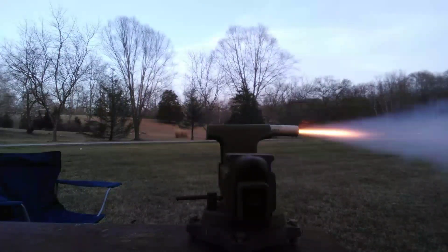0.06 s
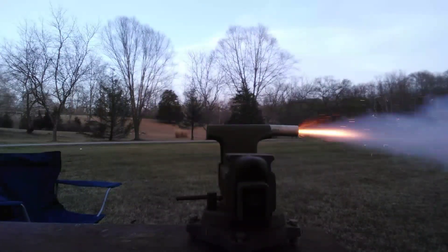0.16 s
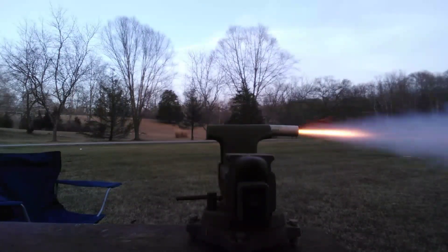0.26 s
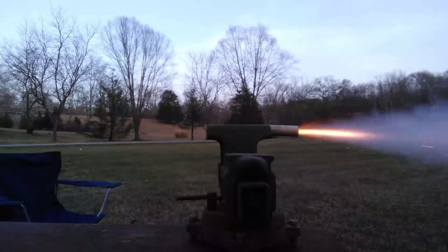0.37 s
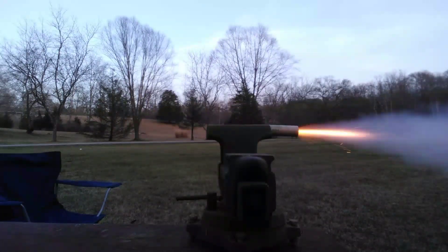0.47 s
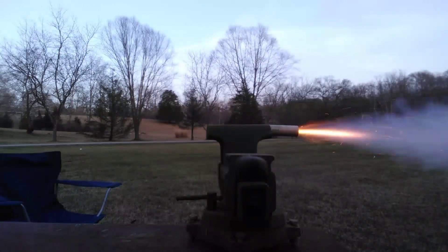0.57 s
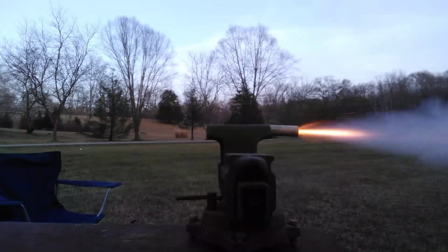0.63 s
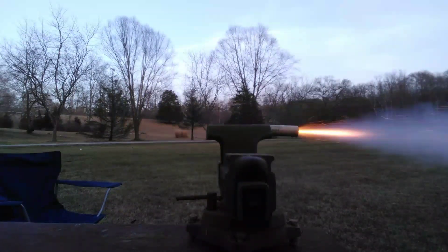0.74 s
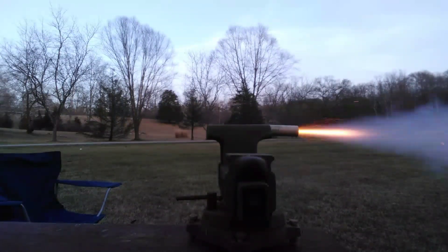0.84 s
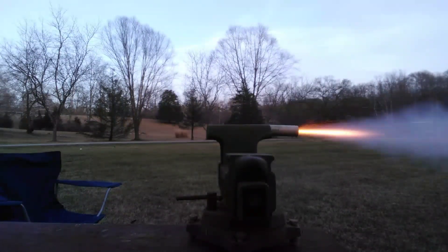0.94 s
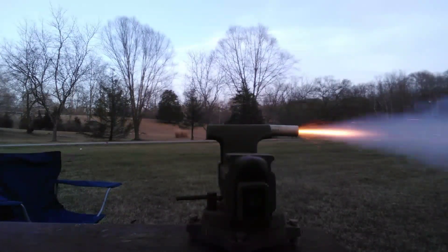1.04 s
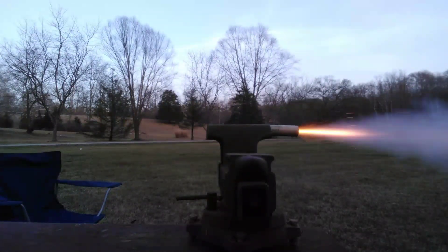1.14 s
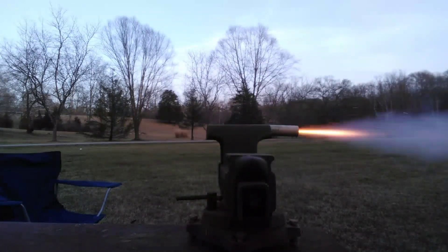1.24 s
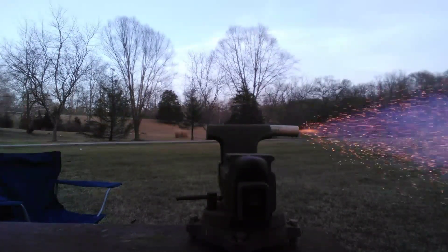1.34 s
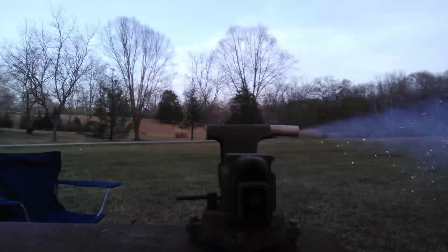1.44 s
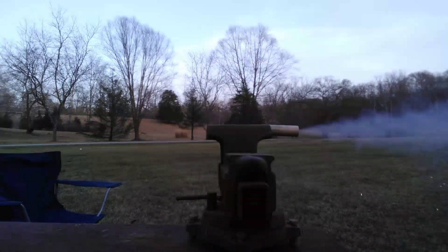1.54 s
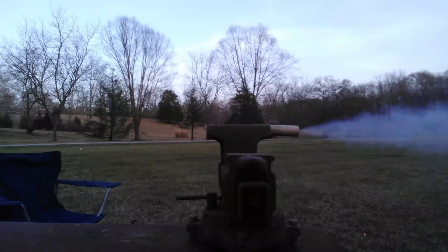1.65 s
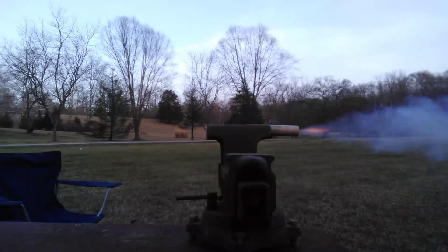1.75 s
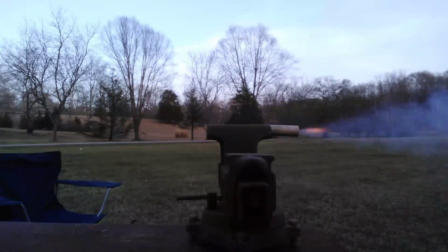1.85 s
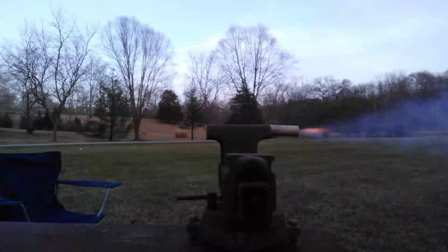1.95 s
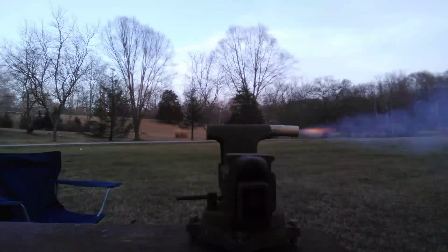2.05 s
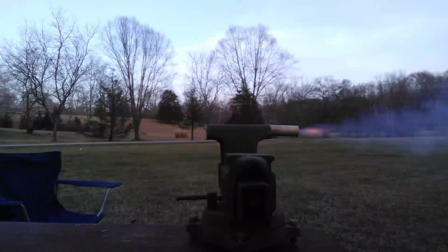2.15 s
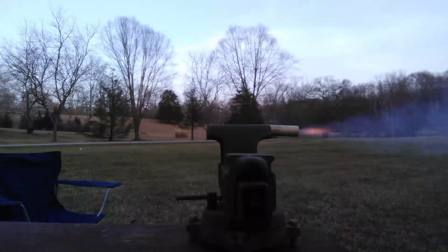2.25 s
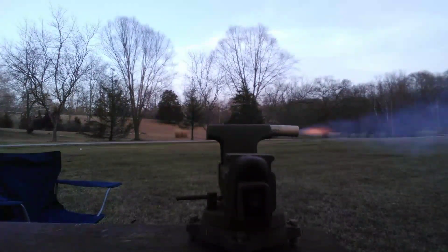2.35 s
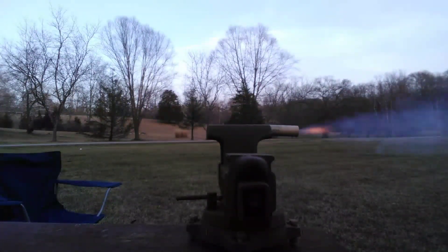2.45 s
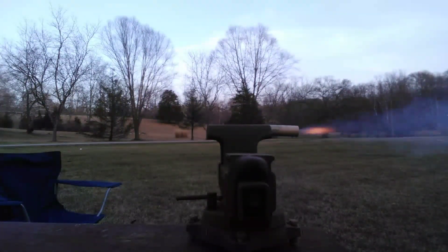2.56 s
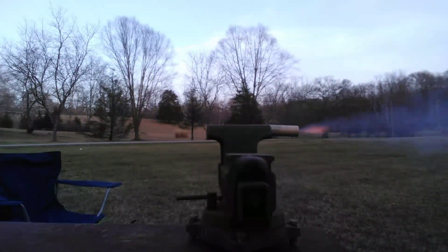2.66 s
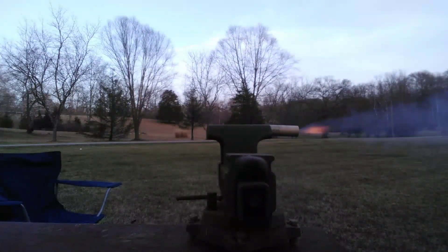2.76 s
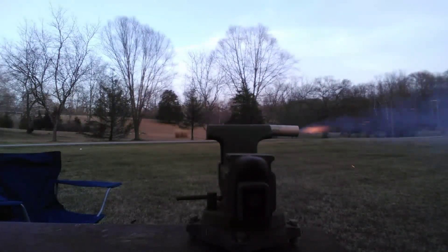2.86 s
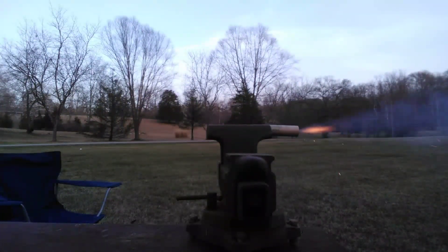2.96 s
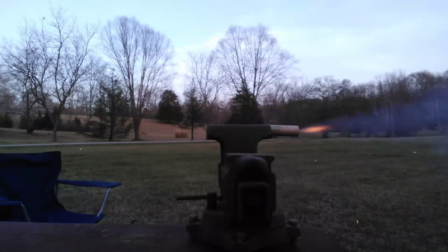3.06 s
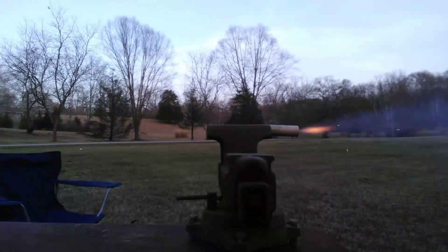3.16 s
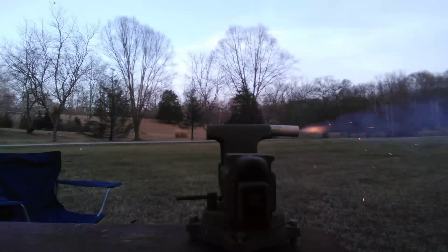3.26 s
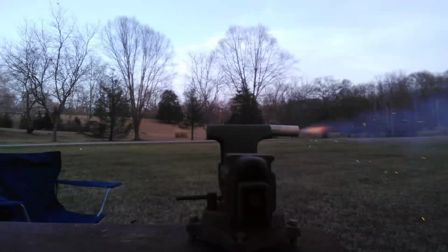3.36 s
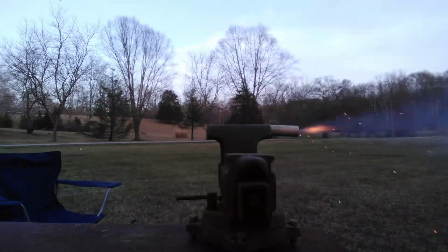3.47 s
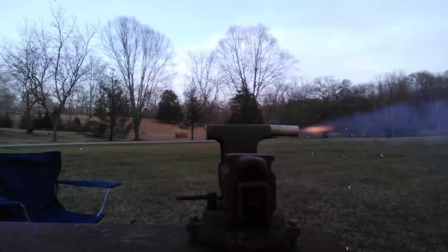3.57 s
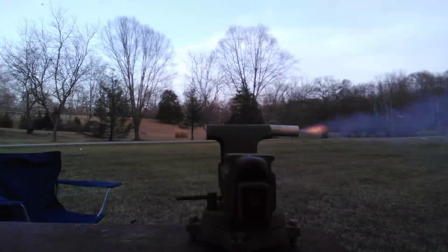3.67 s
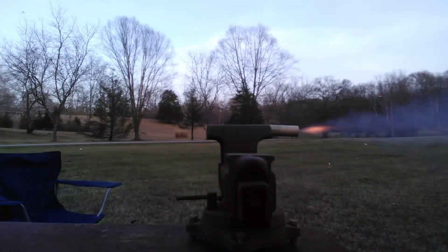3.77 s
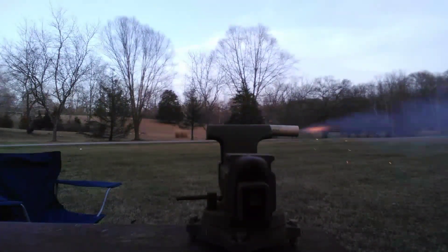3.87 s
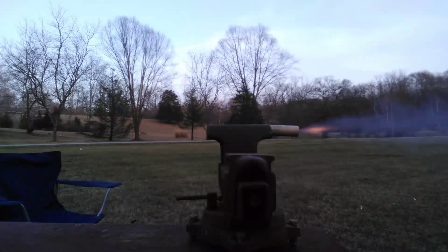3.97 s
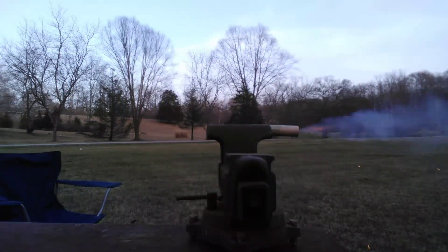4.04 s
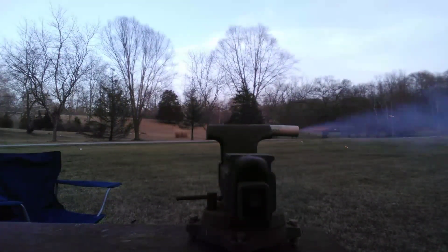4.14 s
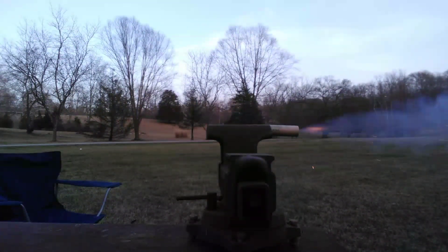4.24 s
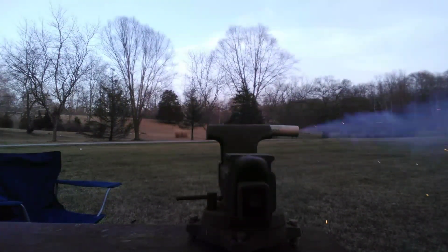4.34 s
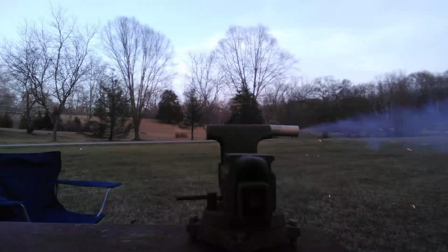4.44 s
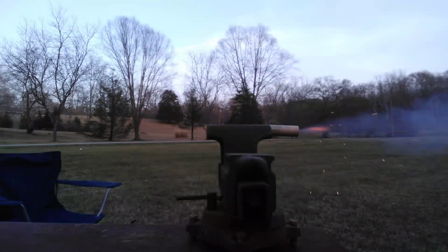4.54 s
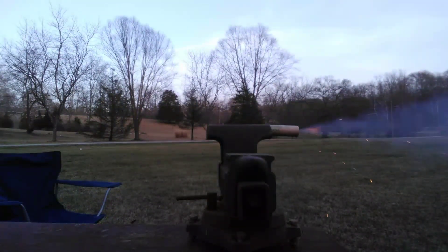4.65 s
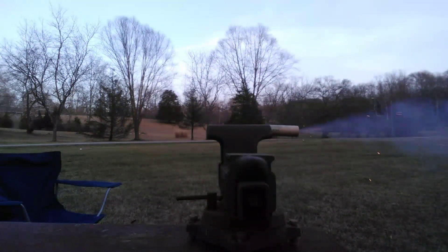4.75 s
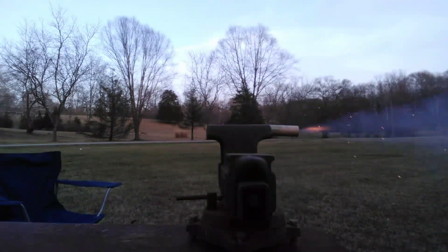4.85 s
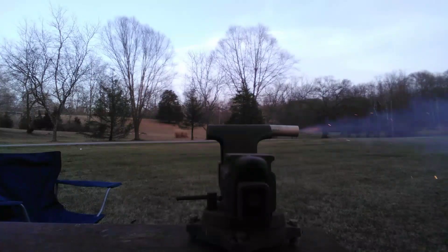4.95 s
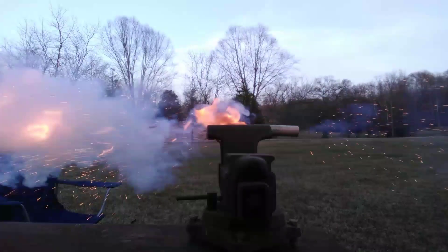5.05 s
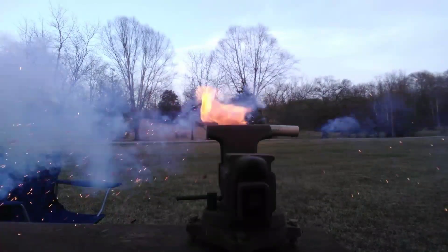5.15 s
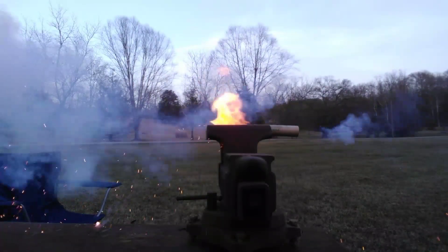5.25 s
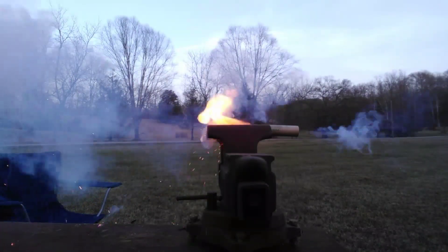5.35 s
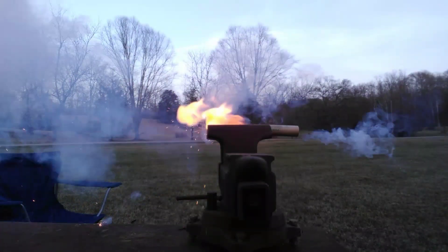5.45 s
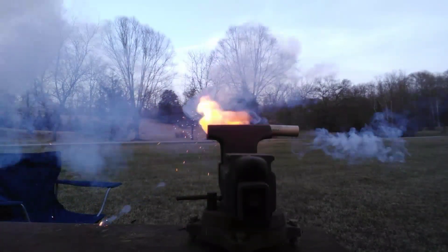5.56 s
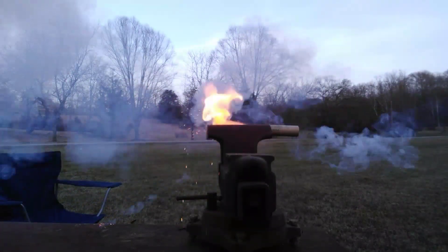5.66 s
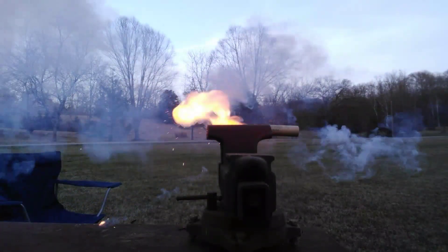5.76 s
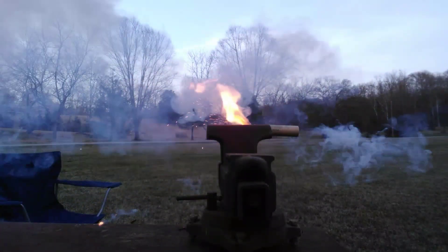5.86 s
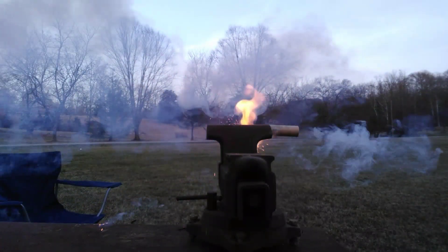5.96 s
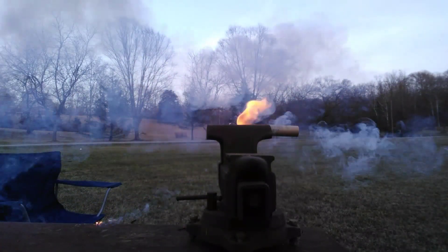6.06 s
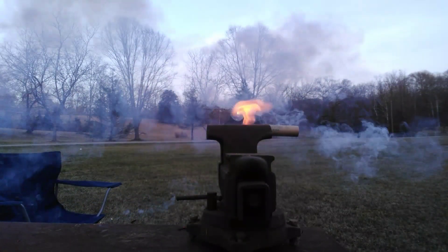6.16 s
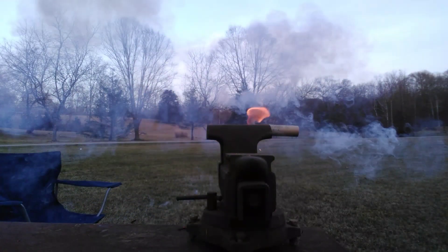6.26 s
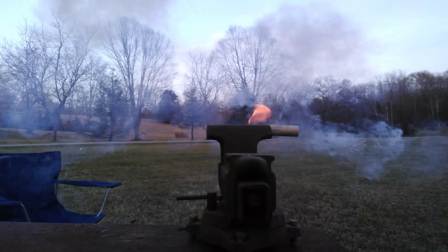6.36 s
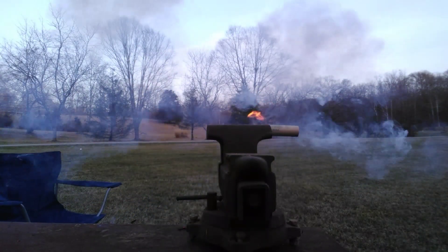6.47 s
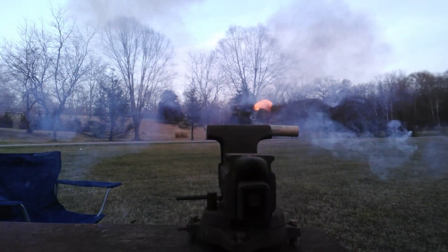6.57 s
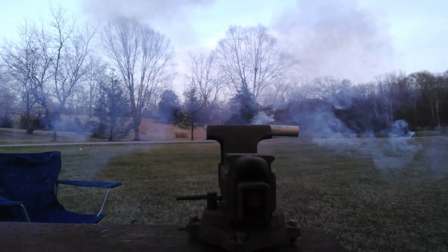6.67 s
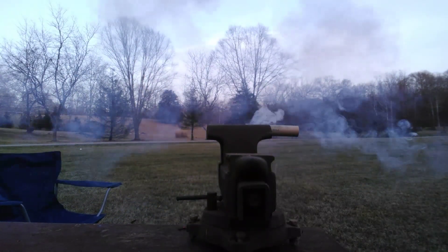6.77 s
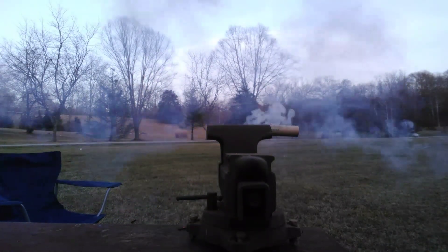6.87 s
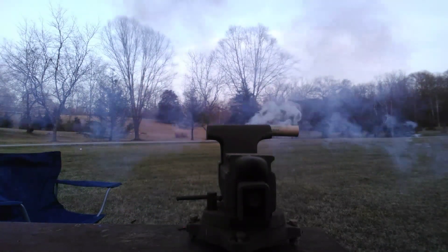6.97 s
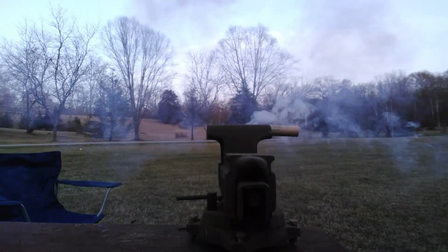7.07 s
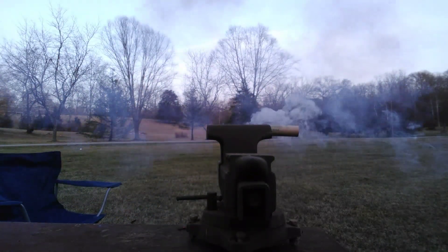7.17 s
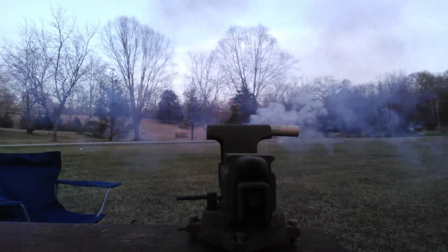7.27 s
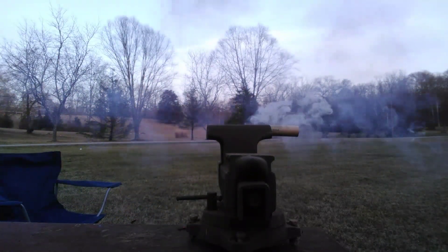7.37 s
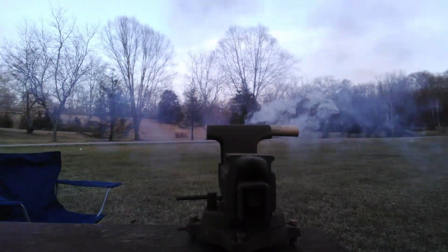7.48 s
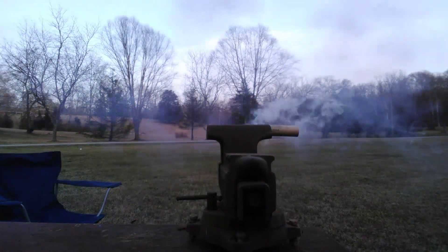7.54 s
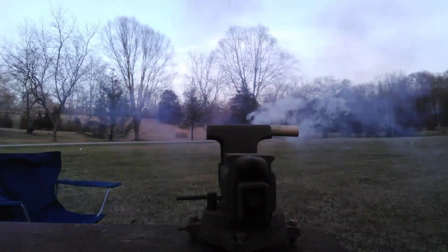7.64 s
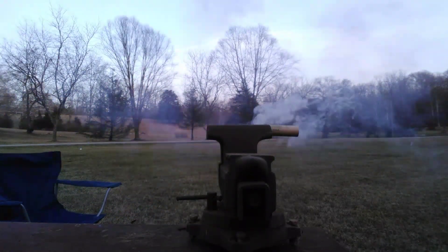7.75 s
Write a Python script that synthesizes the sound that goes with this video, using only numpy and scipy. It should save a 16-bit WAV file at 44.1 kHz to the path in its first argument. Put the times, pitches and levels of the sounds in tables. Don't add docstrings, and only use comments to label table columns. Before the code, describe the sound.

Outdoors in an open yard, a small rocket motor held in a bench vice is heard close, in wide stereo. From 0 to 1.4 s it roars at full thrust, a dense, harsh broadband jet with steep crackle, swelling near 0.7 s. It drops abruptly to a weak burn that sputters and puffs from 1.7 to 2.1 s. Around 2.6 s a brighter hiss opens up and the low fluttering chuff keeps growing, strongest near 3.7 s, with coughs and brief gasps from 3.8 to 4.9 s and a deeper boom after 4.1 s. At 5.07 s a sharp, hollow bang cuts the burn off; its echo dies quickly. Faint rumble and sizzling flame linger until about 6.3 s. Distant hoarse crows call from 5.6 s, clearer after 7 s as the background rises, with a long caw at 7.2 s, a thin rising songbird whistle and small chirps.

```python
import sys
import numpy as np
from scipy import signal
from scipy.fft import rfft, irfft, next_fast_len
from scipy.io import wavfile
from scipy.ndimage import uniform_filter1d

SR = 44100
rng = np.random.default_rng(int(sys.argv[2]) if len(sys.argv) > 2 else 0)


def digitize_waveform(pressure):
    field = np.atleast_2d(pressure).T
    bounded = np.clip(field, -1, 1)
    quanta = np.round(bounded * 32767).astype(np.int16)
    wavfile.write(sys.argv[1], SR, quanta)


def makeup_ratio(level_db):
    decades = np.asarray(level_db, float) / 20
    return 10 ** decades


N = 344421
PADDED = next_fast_len(N + SR // 2)
HZ = np.maximum(np.fft.rfftfreq(PADDED, 1 / SR), 1)
BIRDS_FROM = round(5.25 * SR)
POP_S = 5.0716
JET_CLEARS_S, HISS_SLOW_DB, HISS_FAST_DB = 2.61, -57, -40.5

# frequency in Hz, ports A and B in dB per Hz, likeness of the ports 0-1.
AIR_COLOUR = [(25, -14, -17, 0.88), (59.9, 1, 2.5, 1), (120.2, -0.5, -1, 0.98), (290, -15.5, -14.5, .8),
              (714, -14, -19, 0.399), (1500, -22.5, -15.5, 0.44), (2600, -21, -24, .2),
              (5540, -32, -32, .1), (9590, -32, -35.5, .05), (14300, -33.5, -41.5, .05)]
# frequency in Hz, ports A and B in dB per Hz, likeness of the ports 0-1.
BURN_COLOUR = [(30, -26.5, -31.5, 0.99), (101.3, -13.5, -12, 1), (232, -5, -6.5, 1),
               (960, -3.5, -0.5, 0.88), (1340, -14.5, -1, 0.82), (1780, -10, -11.5, 0.98),
               (2867, -17.5, -11, 0.85), (3240, -18, -18, 0.94), (5263, -28.5, -28.5, 0.5),
               (7466, -30.5, -31, 0.36), (10600, -32, -41.5, 0.87), (12600, -31, -44, 0.39),
               (13600, -51.5, -50, 0.18), (14060, -39.5, -45.5, .2)]
# frequency in Hz, ports A and B in dB per Hz, likeness of the ports 0-1.
ROAR_COLOUR = [(30, -9.5, -9, 0.03), (104.9, 3, -4.5, 0.5), (297, -2.5, -9.5, .3), (790, -6.5, -13, 0.08),
               (1500, -11, -15, 0.9), (2540, -16.5, -6, 0.8), (3720, -11.5, -14.5, 0.12),
               (5660, -18, -14, .3), (7540, -18.5, -17.5, 0), (10000, -16, -18, 0.6),
               (12980, -19.5, -22, .1), (14300, -35.5, -28, 0.3)]
# frequency in Hz, share fed across 0-1.
CROSSFEED_SHARE = [(100, .9), (2100, 0.67), (4200, 0.66), (6300, 0.16), (8300, 0.14), (12000, 0.12)]
# centre in Hz, width in Hz, depth in
# dB.
SUM_CUTS = [(2062, 150, -19), (4082, 420, -15)]
# centre in Hz, width in Hz, depth in dB.
HISS_CUTS = [(5390, 200, -8.5), (6640, 200, -11.5), (10550, 260, -8.5), (14350, 300, -11.5)]
# time from its start in seconds, pitch in Hz.
CAW_PITCH = [(0, 600), (.03, 685), (.065, 700), (.11, 625), (.16, 603), (.25, 582), (.33, 552), (.41, 450)]
# start in seconds, length in seconds, stretch of the pitch shape, pitch factor, level in dB.
CAWS = [
    (5.63, 0.29, 1.04, 1, -66),
    (6.2, 0.13, 0.94, 0.97, -70),
    (6.335, 0.32, .8, 1.01, -61),
    (6.622, 0.21, 1.4, 1, -60),
    (7.045, .1, 1.3, 1.03, -59),
    (7.204, .41, .99, .985, -50),
]
# frequency in Hz, gain in dB.
CAW_THROAT = [(400, -34), (650, -19), (1000, -22), (1150, -3), (1380, 0), (1830, -2), (1950, -25),
              (3000, -35)]
# centre in seconds, level in dB, half width in seconds.
FLOCK_WAVES = [
    (5.9, -71.5, .2),
    (6.3, -72, .15),
    (6.68, -63, .2),
    (7.1, -64.5, .06),
    (7.3, -58, .12),
    (7.56, -58, .1),
    (7.8, -61.5, .15),
]
# start in seconds, length in seconds, start pitch in Hz, end pitch in Hz, level in dB.
SONGS = [
    (7.15, .39, 3050, 4150, -56),
    (7.31, .2, 3200, 3800, -72),
    (7.02, .04, 1450, 1850, -66),
    (6.435, .025, 6900, 7600, -83),
    (6.48, .025, 7300, 8000, -82),
    (6.89, .065, 6000, 8000, -77),
    (7.088, .04, 6400, 8100, -73),
    (7.597, .014, 5000, 8400, -61),
]
# delay after the pop in seconds, frequency in Hz, level in dB, swell in seconds.
POP_MODES = [
    (0, 435, -2.5, .00115),
    (.0019, 150, -5.5, .003),
    (.004, 60, -17, .009),
    (0, 2700, -19, .0006),
    (.0118, 450, -17, .0006),
]
# time in seconds, chuff level in dB.
CASE_PRESSURE = [
    (1.42, -58.5),
    (1.49, -48.5),
    (1.8, -42.5),
    (2.16, -33),
    (2.56, -30.5),
    (2.85, -25.5),
    (3.5, -22),
    (3.72, -20.5),
    (4.7, -22.5),
]
# centre in seconds, depth in dB, half width in seconds.
LULLS = [
    (2.02, 10, 0.046),
    (3.08, 5.5, 0.42),
    (3.597, 5.5, 0.0096),
    (4.248, 9, 0.027),
    (4.43, 4, 0.041),
    (4.535, 7, 0.021),
]
# moment of clearing in seconds, depth in dB, choke time in seconds.
CHOKES = [(1.698, 12, .015), (1.762, 13, .015), (1.807, 15, .02), (1.875, 9, .01), (1.944, 10, .012),
          (2.126, 11, .012), (3.816, 11, .01), (4.116, 14, .016), (4.268, 8, .015), (4.413, 10, .008),
          (4.447, 12, .012), (4.568, 8, .012), (4.881, 12, .012)]
# centre in seconds, rise in dB, half width in seconds.
SURGES = [
    (0.0, 2.36, 0.081),
    (.68, 2.5, 0.15),
    (1.17, 1, .05),
]


def clock():
    return np.arange(N) / SR


def bumps(rows):
    return sum(size * np.exp(-((clock() - s) / width_s) ** 2) for s, size, width_s in rows)


def soft_step(s, width_s):
    return .5 + .5 * np.tanh((clock() - s) / width_s / 2)


def drift(rate_hz):
    r = np.exp(-16 * np.pi * rate_hz / SR)
    slow = signal.lfilter([1], [1, -2 * r, r * r], rng.standard_normal(N // 8 + 4002))[4000:]
    return np.interp(np.arange(N) / 8, np.arange(len(slow)), slow / slow.std())


def power_sum(*levels_db):
    return 10 * np.log10(sum(makeup_ratio(db) ** 2 for db in levels_db) + 1e-14)


def at_hz(points):
    hz, *columns = np.transpose(points)
    return [np.interp(np.log(HZ), np.log(hz), c) for c in columns]


def late(samples):
    return np.exp(-2j * np.pi * HZ * samples / SR)


def notches_db(rows):
    return sum(db * np.exp(-((HZ - hz) / width_hz) ** 4) for hz, width_hz, db in rows)


def crossfed(spectra):
    share, = at_hz(CROSSFEED_SHARE)
    lag_samples = 21
    return spectra - np.clip(share, 0, 1) * late(lag_samples) * spectra[::-1]


def cut_sum(spectra, cut_db):
    return spectra - (1 - makeup_ratio(cut_db)) * spectra.mean(axis=0)


def thinned_sum(spectra, share=1):
    depth = np.where(HZ < 3000, .6 + .4 * share, share ** 2)
    return cut_sum(spectra, notches_db(SUM_CUTS) * depth)


def port_noise(colour, lag_samples, shared):
    db_a, db_b, alike = at_hz(colour)
    alike = np.clip(alike, 0, 1)
    own = rfft(rng.standard_normal((2, PADDED)))
    wave = rfft(shared / shared.std()) * np.array([late(lag_samples), late(0)])
    db_a = db_a + 10 * np.exp(-.5 * ((HZ - 12690) / 950) ** 2)
    return makeup_ratio(np.array([db_a, db_b])) * (np.sqrt(alike) * wave + np.sqrt(1 - alike) * own)


def layer(spectra, low_hz, high_hz, level_db):
    band = spectra / np.sqrt((1 + (low_hz / HZ) ** 8) * (1 + (HZ / high_hz) ** 8))
    rms = np.sqrt(2 * np.sum(np.abs(crossfed(band).mean(axis=0)) ** 2)) / PADDED
    return irfft(band, PADDED)[:, :N] / rms * makeup_ratio(level_db)


def placed(x, lag_samples):
    n = np.arange(len(x))
    port_a = np.interp(n - max(lag_samples, 0), n, x)
    port_b = np.interp(n - max(-lag_samples, 0), n, x)
    return np.array([port_a, port_b])


def far(ports, t60_s, wet_db):
    t = np.arange(SR // 2) / SR
    tail = rng.standard_normal((2, len(t))) * makeup_ratio(-60 * t / t60_s) * (t > .015)
    tail = tail / np.sqrt((tail ** 2).sum(axis=1, keepdims=True))
    return ports + makeup_ratio(wet_db) * irfft(rfft(ports, PADDED) * rfft(tail, PADDED), PADDED)[:, :N]


def swell(t, length_s, rise_share):
    return np.clip(np.minimum(t, length_s - t) / (rise_share * length_s), 0, 1) ** 2


def yard():
    gain_db = 11 * soft_step(7.15, .18)
    echo_db = 11 - 36.5 * np.maximum(clock() - 5.2, 0)
    wadding_db = 11 - 6 * (1 - soft_step(5.8, .06)) - 30 * soft_step(6.32, .06)
    air = port_noise(AIR_COLOUR, .5, rng.standard_normal(PADDED))
    spectra = thinned_sum(air, share=0.38)
    rumble_db = -78.5 + power_sum(gain_db, echo_db, wadding_db - 7.5) + 1.1 * drift(36)
    embers_db = -78 + power_sum(gain_db, echo_db - 6.5)
    flare_db = -78.5 - 9 * ((clock() - 5.78) / .3) ** 2
    sizzle_db = -88 + power_sum(.8 * gain_db, echo_db + 1.5, wadding_db)
    deep = layer(spectra, 30, 150, -81 + 1.5 * gain_db)
    rumble = layer(spectra, 140, 670, rumble_db)
    embers = layer(spectra, 1100, 6000, embers_db)
    flare = layer(spectra, 2300, 4000, flare_db)
    sizzle = layer(spectra, 6000, 15000, sizzle_db)
    return deep + rumble + embers + flare + sizzle


def crows():
    out = 0
    shape_s, shape_hz = np.transpose(CAW_PITCH)
    hoarse = makeup_ratio(2.0 * drift(73))[BIRDS_FROM:]
    wobble = 1 + 0.0058 * drift(25)[BIRDS_FROM:]
    rasp = 0.67 * rng.standard_normal(N - BIRDS_FROM)
    for s, length_s, stretch, factor, level_db in CAWS:
        t = clock()[BIRDS_FROM:] - s
        hz = factor * np.interp(t / stretch, shape_s, shape_hz) * wobble
        phase = 2 * np.pi * np.cumsum(hz) / SR
        second = makeup_ratio(2.5 - 21 * np.clip(t, 0, 1)) * np.sin(2 * phase)
        third = makeup_ratio(-7.5) * np.sin(3 * phase)
        voice = np.sin(phase) + second + third + rasp
        out = out + placed(makeup_ratio(level_db) * voice * swell(t, length_s, 0.075) * hoarse, -21.0)
    flock = bumps([(s, makeup_ratio(db + 10), width_s) for s, db, width_s in FLOCK_WAVES])[BIRDS_FROM:]
    out = out + placed(flock * hoarse * rng.standard_normal(N - BIRDS_FROM), -20.5)
    out = np.pad(out, ((0, 0), (BIRDS_FROM, 0)))
    throat_db, = at_hz(CAW_THROAT)
    throated = irfft(rfft(out, PADDED) * makeup_ratio(throat_db), PADDED)[:, :N]
    return far(throated, t60_s=0.63, wet_db=-9)


def songbirds():
    out = 0
    for s, length_s, start_hz, end_hz, level_db in SONGS:
        t = clock()[BIRDS_FROM:] - s
        hz = start_hz + (end_hz - start_hz) * np.clip(t / length_s, 0, 1) ** 0.81
        whistle = np.sin(2 * np.pi * np.cumsum(hz) / SR)
        level = makeup_ratio(level_db - 31 * np.clip(t, 0, 1))
        out = out + placed(level * swell(t, length_s, 0.36) * whistle, -1.1)
    return far(np.pad(out, ((0, 0), (BIRDS_FROM, 0))), t60_s=.4, wet_db=-5)


def pop():
    out = np.zeros(N)
    for delay_s, hz, level_db, swell_s in POP_MODES:
        t = np.clip(clock() - POP_S - delay_s, 0, None)
        envelope = t / swell_s * np.exp(1 - t / swell_s)
        out += makeup_ratio(level_db) * envelope * np.sin(2 * np.pi * hz * t)
    return far(placed(out, 1.5), t60_s=.14, wet_db=-21)


def choking():
    puff_share, puff_s = 0.57, .012
    out = np.zeros(N)
    for s, depth_db, choke_s in CHOKES:
        near = slice(int((s - .1) * SR), int((s + .1) * SR))
        t = clock()[near] - s
        sinking = -np.exp(-np.abs(t) / choke_s)
        puff = puff_share * np.exp(-np.abs(t) / puff_s)
        out[near] += depth_db * np.where(t < 0, sinking, puff)
    return uniform_filter1d(out, size=60)


def burn_levels():
    s, db = np.transpose(CASE_PRESSURE)
    lit_s = s[0]
    chuff_db = np.interp(clock(), s, db, left=-140) - bumps(LULLS)
    jet_db = HISS_SLOW_DB + (HISS_FAST_DB - HISS_SLOW_DB) * soft_step(JET_CLEARS_S, 0.19)
    blow_db = 14 * np.exp(np.minimum(clock() - POP_S, 0) / .014)
    unlit_db = np.where(clock() < lit_s, -99, 0)
    jet_tail_db = -48 - 131.5 * (clock() - lit_s) + 2 * unlit_db
    flame_db = -35.5 + .35 * (chuff_db + 22) + 0.57 * (jet_db - HISS_FAST_DB)
    flame_db = flame_db + bumps([(3.25, 3.55, 0.45)])
    flame_db = power_sum(flame_db + .8 * blow_db, jet_tail_db - 5)
    hiss_db = power_sum(jet_db + blow_db + unlit_db, jet_tail_db)
    return chuff_db - .4 * blow_db, flame_db, hiss_db


def smoke_burn():
    chuff_db, flame_db, hiss_db = burn_levels()
    bench_echo = 1 + 0.63 * late(16.08) / (1 + (HZ / 6000) ** 4)
    gas = port_noise(BURN_COLOUR, 5.32, rng.standard_normal(PADDED))
    spectra = cut_sum(thinned_sum(gas * bench_echo), notches_db(HISS_CUTS))
    choke_db = choking()
    flutter = 1.0 * drift(25) + 0.54 * drift(140)
    unsteady = 1.5 + np.clip((-chuff_db - 20) / 15, 0, 1)
    boom_db = 9.5 * soft_step(4.1, .015)
    rumble_db = 1.2 * (chuff_db + 19.5) - 49.0 + boom_db + 2.5 * drift(6)
    hiss_db = hiss_db + 0.54 * flutter + 0.98 * drift(7.0)
    heating_db = 2.5 * (clock() - 3.8) * soft_step(JET_CLEARS_S, .1)
    rumble = layer(spectra, 35.06, 140, rumble_db)
    chuff = layer(spectra, 130, 1100, chuff_db + 0.66 * flutter * unsteady + choke_db)
    flame = layer(spectra, 1600, 4800, flame_db - 2.0 + 1.8 * flutter + 0.82 * choke_db)
    hiss = layer(spectra, 4200, 9500, hiss_db - 3.0)
    top_hiss = layer(spectra, 9500, 15000, hiss_db - 5.5 + heating_db)
    since_s = np.clip(clock() - POP_S - .002, 0, None)
    dying = 0.92 * makeup_ratio(-6000 * since_s) + 0.09 * makeup_ratio(-330 * since_s)
    return (rumble + chuff + flame + hiss + top_hiss) * dying


def thrust():
    burnout_s, knee_s = 1.3783, .022
    spent_s = knee_s * np.logaddexp(0, (clock() - burnout_s) / knee_s)
    roar_db = -21.5 - 0.9 * clock() + bumps(SURGES) - 520.5 * spent_s
    spikes_db = 4.27 * np.minimum(rng.exponential(1, PADDED), 4)
    crackle = rng.standard_normal(PADDED) * makeup_ratio(spikes_db)
    surge_db = 0.6 * drift(6.2) + 0.44 * drift(140)
    return layer(thinned_sum(port_noise(ROAR_COLOUR, 5.78, crackle)), 15, 15000, roar_db + surge_db)


def scene():
    return yard() + crows() + songbirds() + pop() + smoke_burn() + thrust()


def top_cut(x):
    return signal.sosfilt(signal.butter(12, 14410, fs=SR, output="sos"), x)


def record(dry):
    wide = irfft(crossfed(rfft(dry, PADDED)), PADDED)[:, :N]
    wide = 1.3 * np.tanh(wide / 1.3)
    hiss = signal.lfilter([1], [1, -.8], rng.standard_normal((2, N)))
    return top_cut(wide + makeup_ratio(-91) * hiss)


dry = scene()
out = record(dry)
digitize_waveform(out)
```